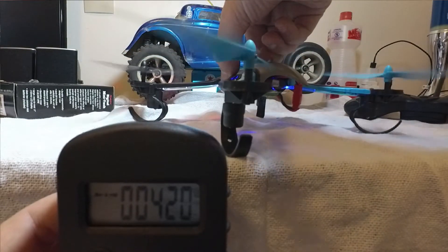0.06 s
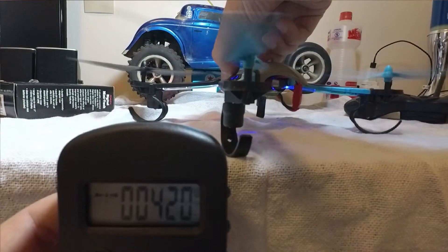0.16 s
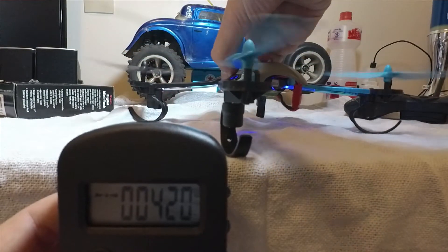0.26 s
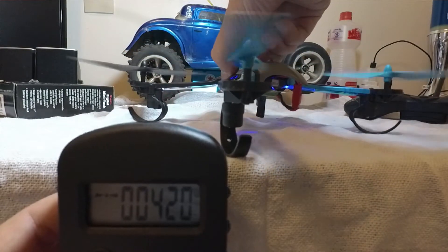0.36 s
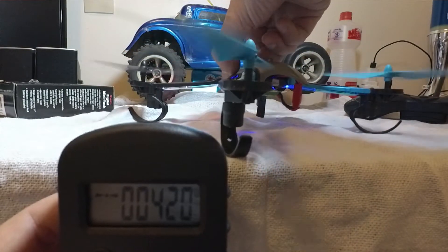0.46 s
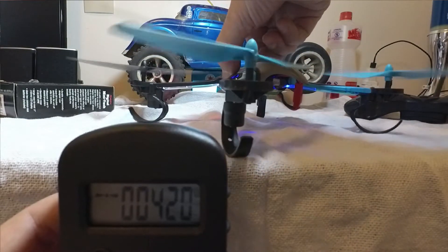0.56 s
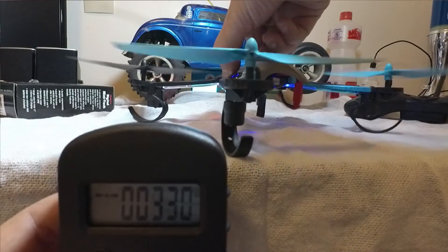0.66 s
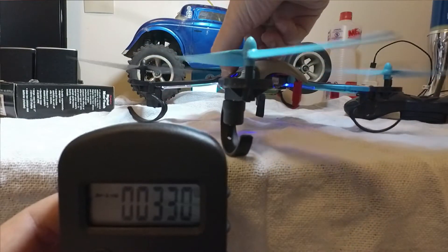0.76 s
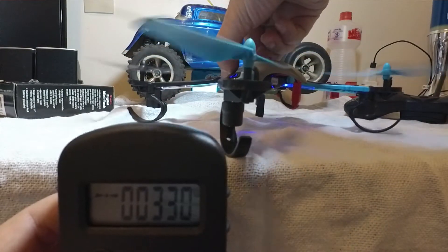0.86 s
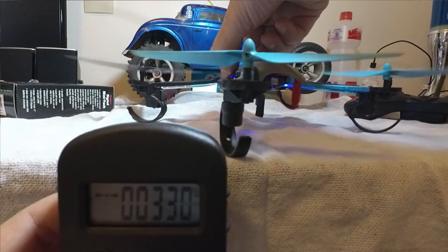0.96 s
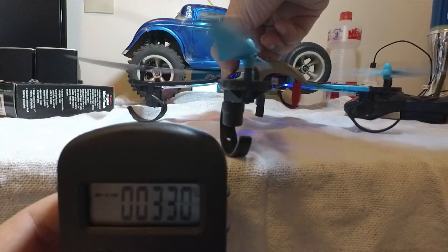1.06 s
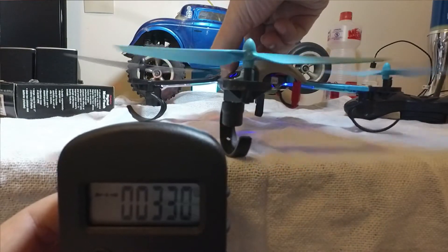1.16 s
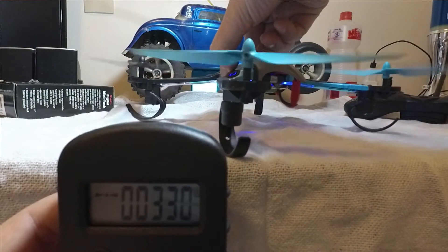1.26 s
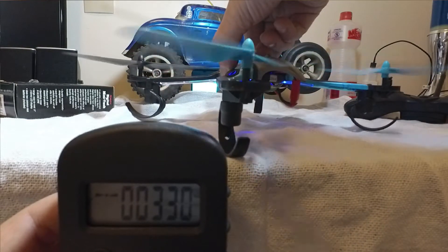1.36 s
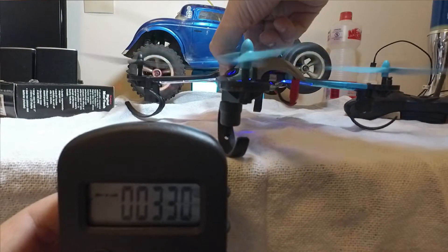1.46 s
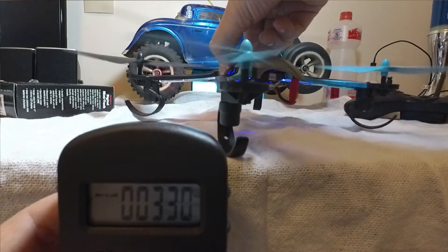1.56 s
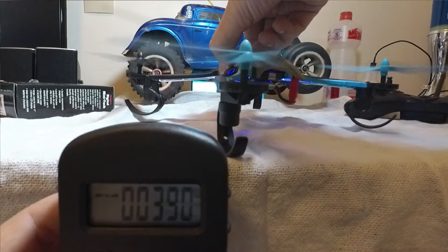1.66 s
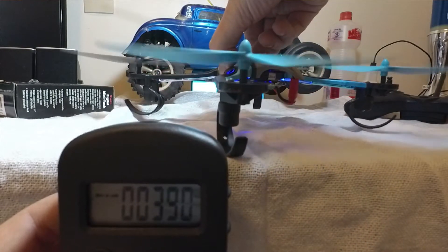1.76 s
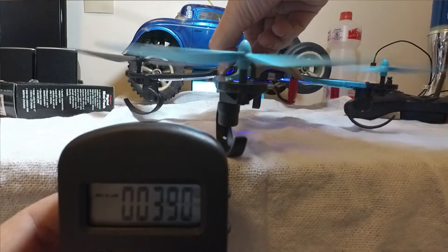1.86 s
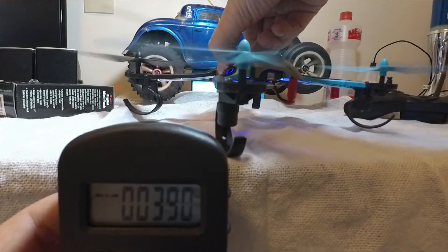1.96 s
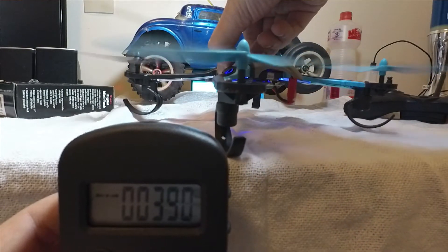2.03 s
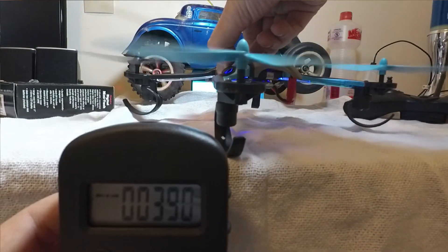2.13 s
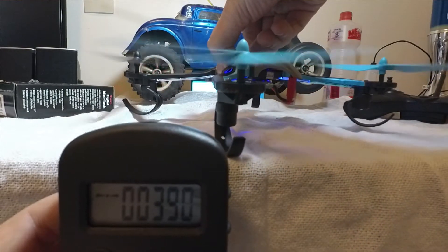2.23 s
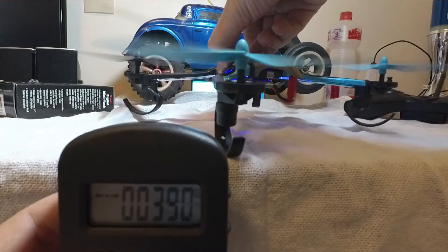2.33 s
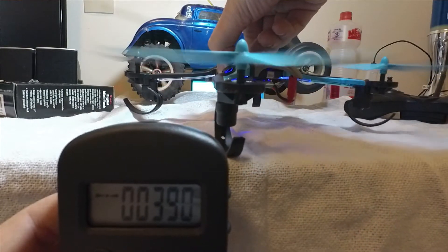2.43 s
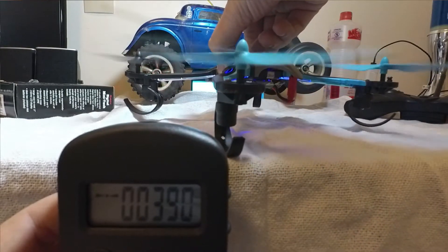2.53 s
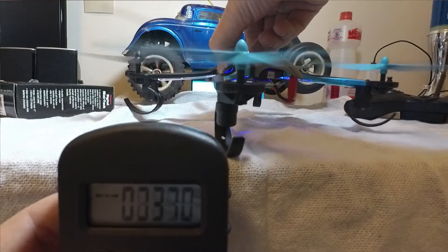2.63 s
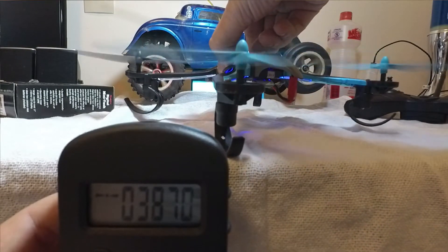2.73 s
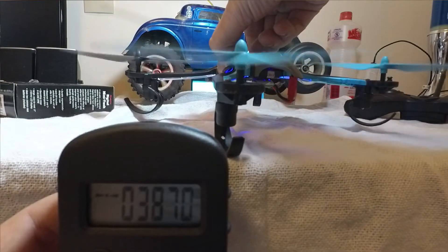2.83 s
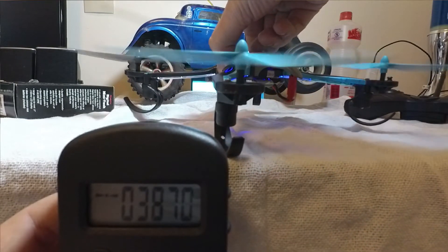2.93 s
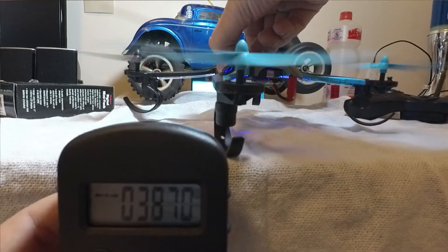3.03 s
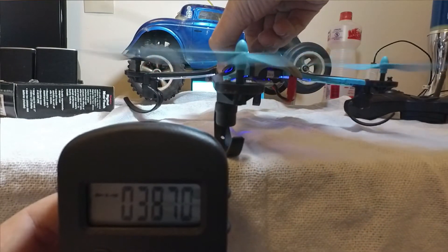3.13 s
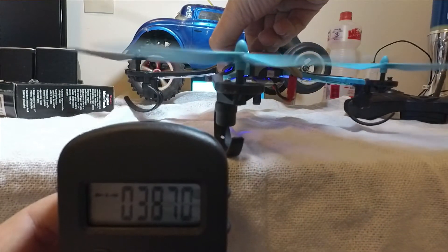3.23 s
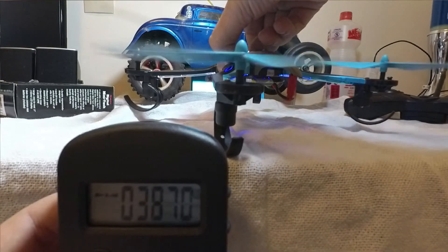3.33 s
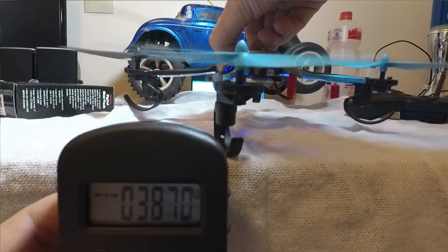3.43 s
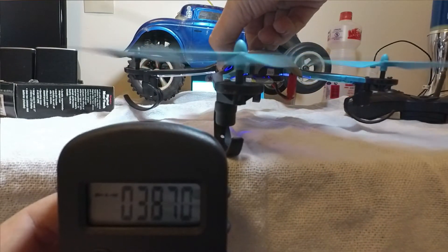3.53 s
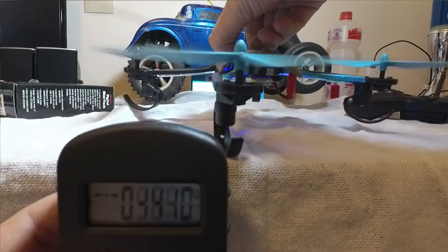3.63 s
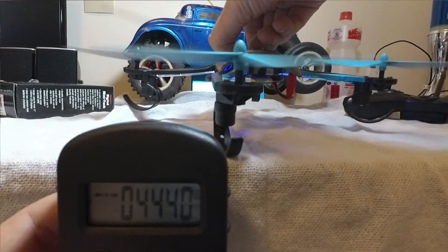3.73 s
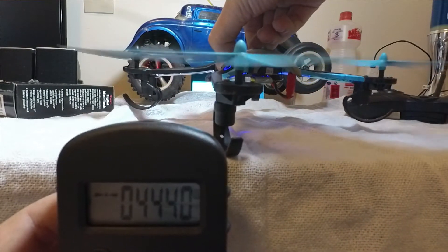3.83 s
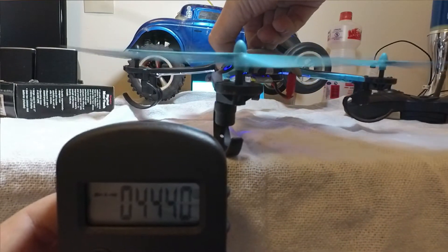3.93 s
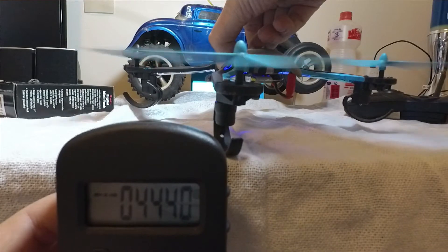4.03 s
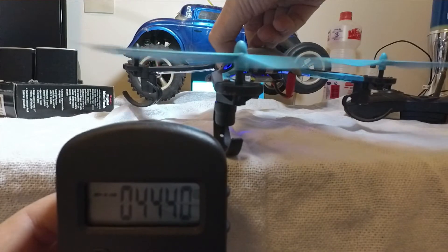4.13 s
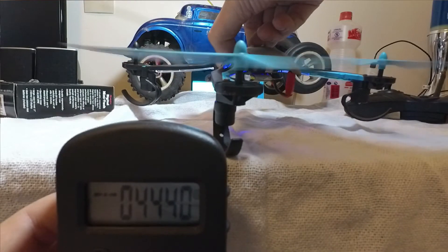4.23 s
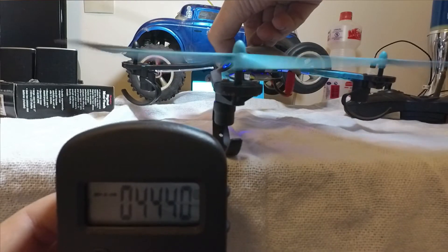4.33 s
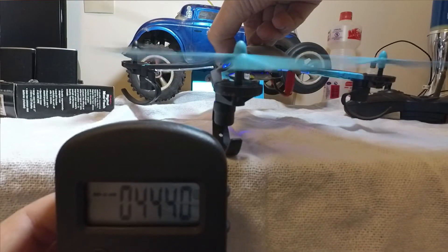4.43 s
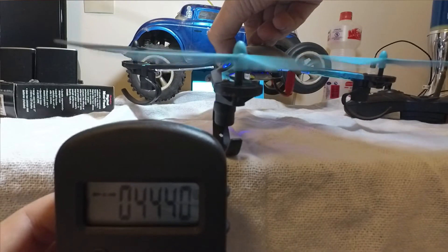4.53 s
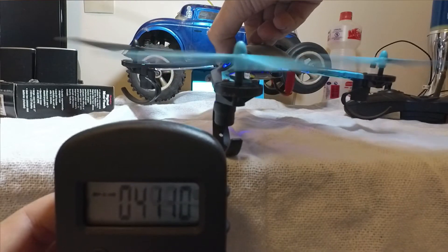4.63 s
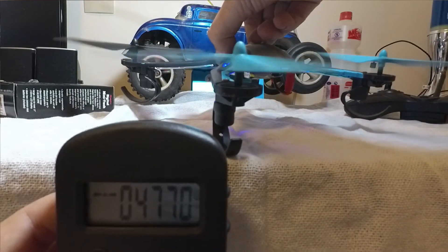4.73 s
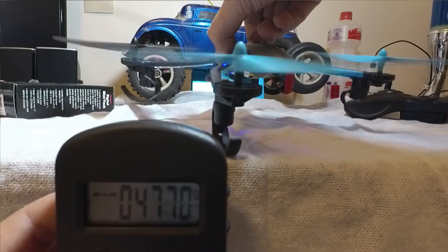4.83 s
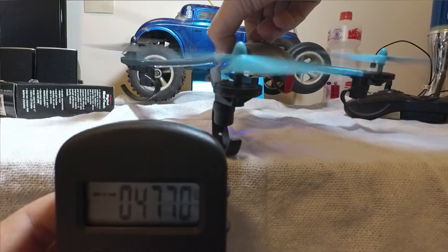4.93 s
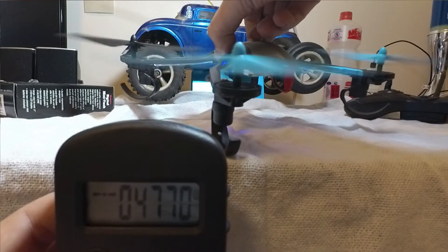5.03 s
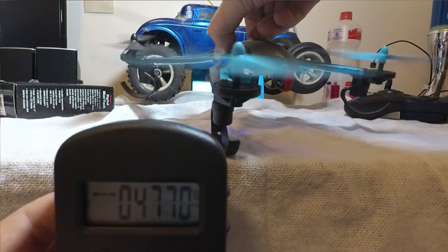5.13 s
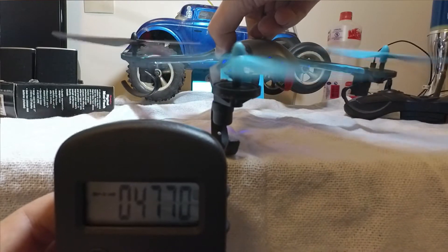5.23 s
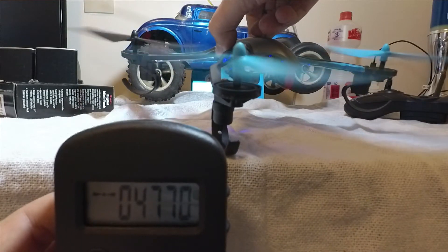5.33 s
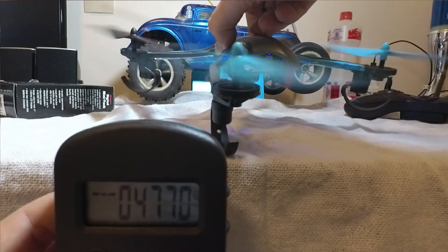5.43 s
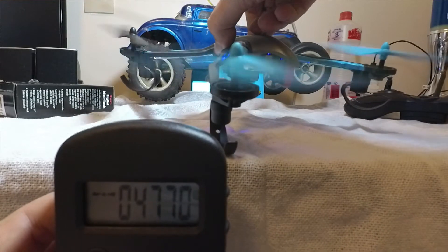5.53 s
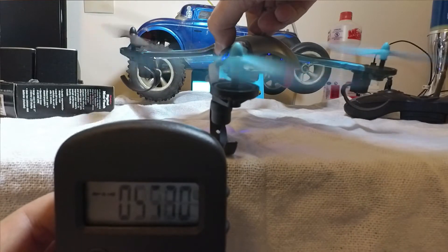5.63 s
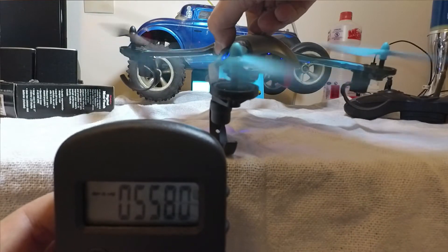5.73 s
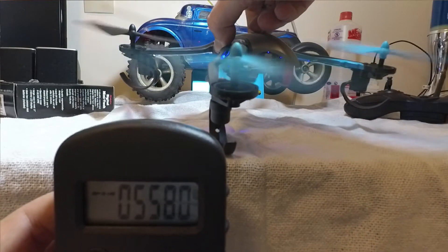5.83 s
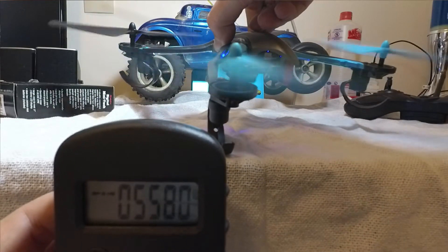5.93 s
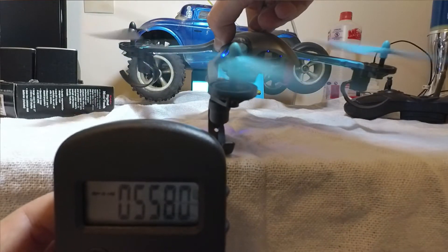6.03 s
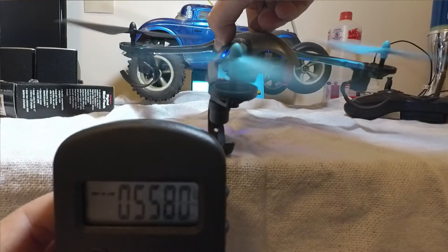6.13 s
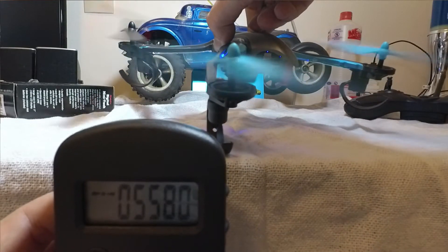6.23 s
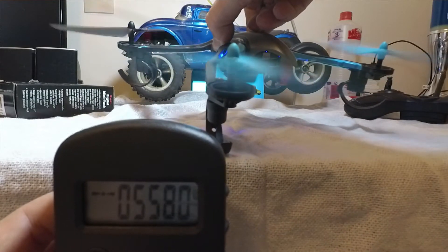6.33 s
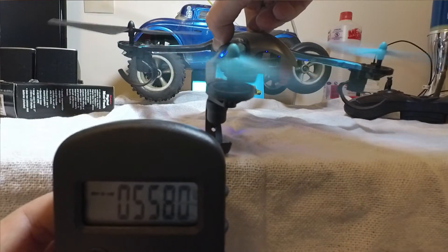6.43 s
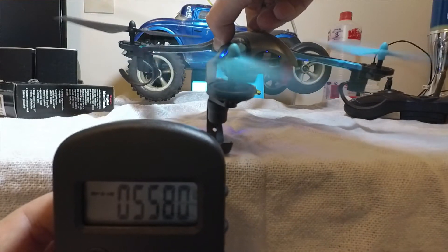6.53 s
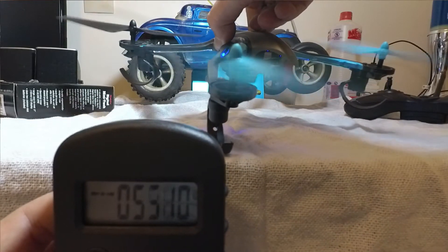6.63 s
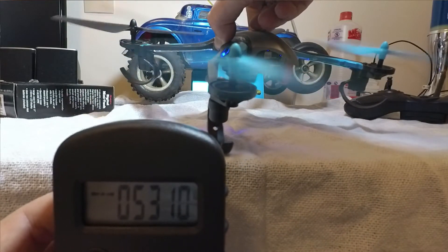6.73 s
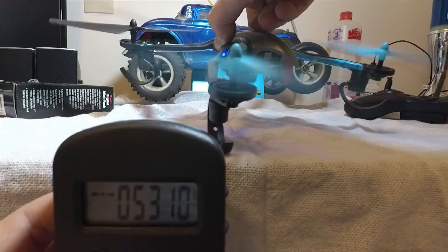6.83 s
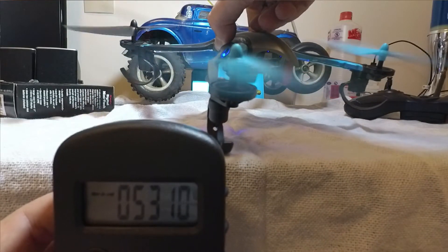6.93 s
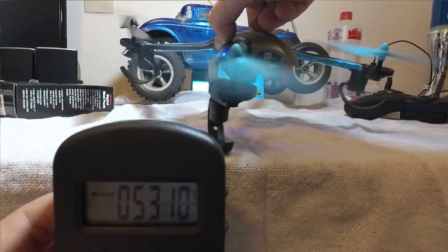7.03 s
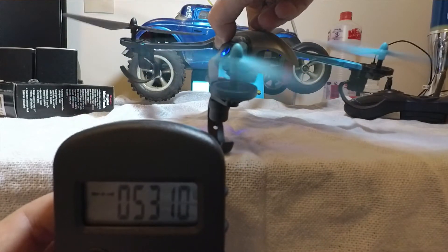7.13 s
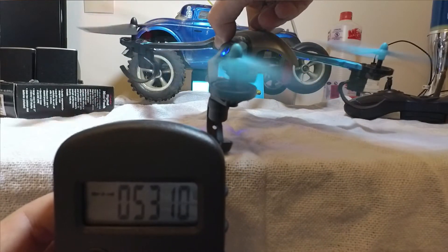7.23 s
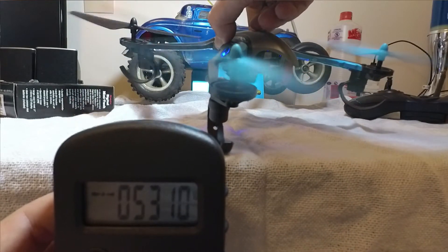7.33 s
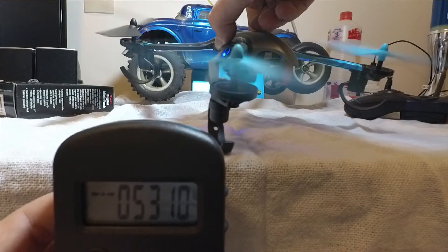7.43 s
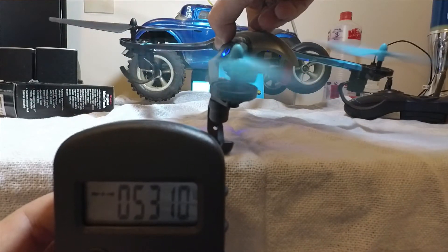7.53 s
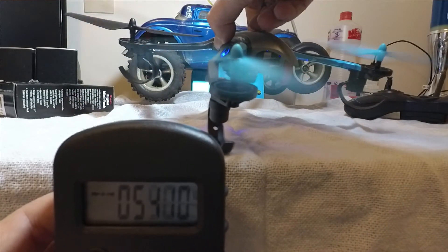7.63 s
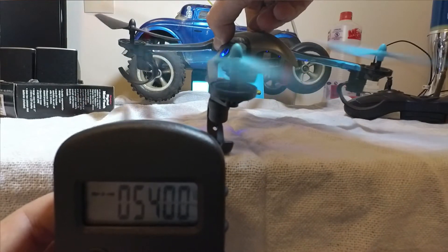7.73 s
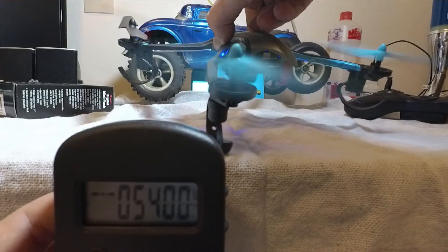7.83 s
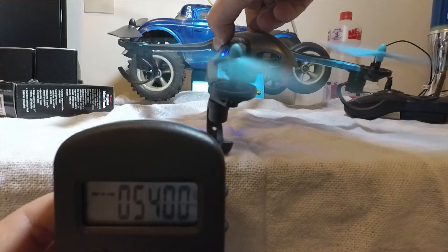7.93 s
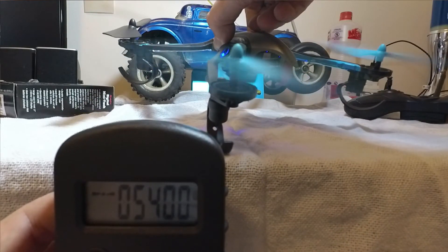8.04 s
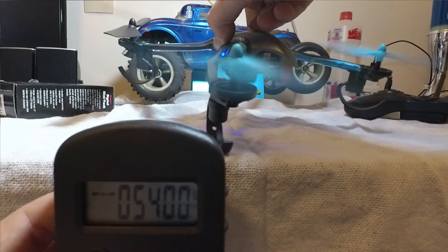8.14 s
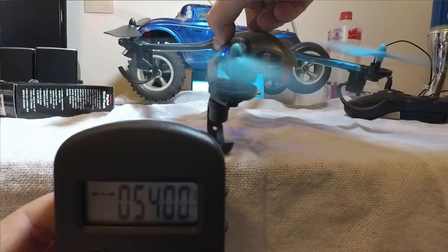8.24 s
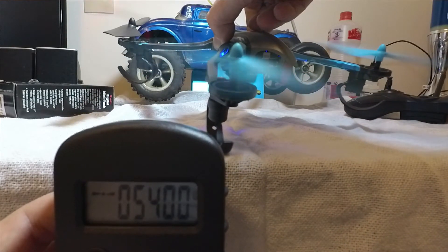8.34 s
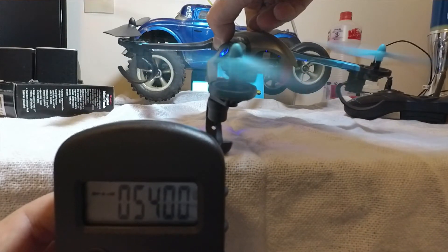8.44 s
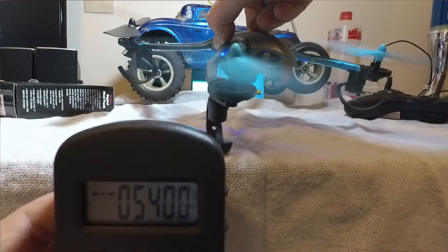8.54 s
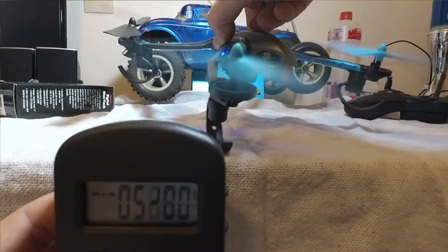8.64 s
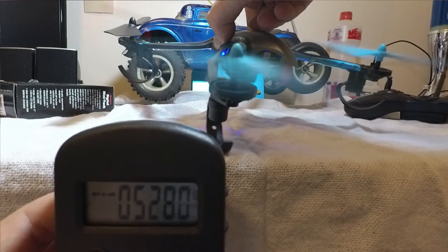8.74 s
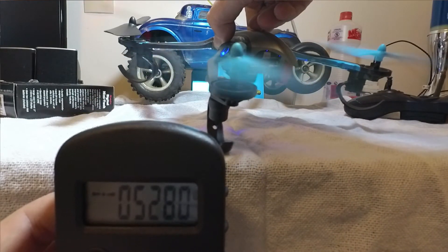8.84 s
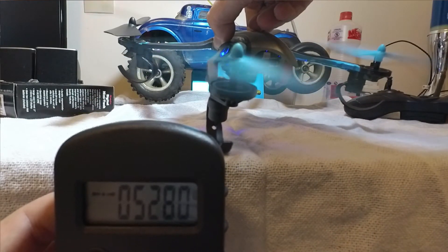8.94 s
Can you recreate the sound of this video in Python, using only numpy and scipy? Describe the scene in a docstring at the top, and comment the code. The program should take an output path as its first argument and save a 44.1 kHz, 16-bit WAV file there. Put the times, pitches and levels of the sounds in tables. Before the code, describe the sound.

Small electric motors and plastic propellers idle with a ticking rattle, then speed up to a steady buzzing whine indoors.

```python
"""A toy quadcopter, held down by hand on a cloth in a small room, is slowly throttled up.
Three brushed motors each turn a propeller through a plastic gear. The teeth whine, knock and rattle
in the hollow frame, which rings near 3.6 kHz. The blades hum and blow air at the microphone,
and the motor current, switched on and off very fast, adds a thin whistle of steady pitch."""
import sys
import numpy as np
from scipy import signal
from scipy.fft import rfft, irfft, next_fast_len
from scipy.io import wavfile

SR = 44100
rng = np.random.default_rng(int(sys.argv[2]) if len(sys.argv) > 2 else 0)


def pcm_store(signal):
    """Save signal as 16-bit PCM."""
    levels = np.round(np.clip(np.atleast_2d(signal), -1, 1) * 32767)
    wavfile.write(sys.argv[1], SR, levels.astype(np.int16).T)


N = 396018
TIME = np.arange(N) / SR
SIZE = next_fast_len(N + SR // 2, True)
HZ = np.maximum(np.arange(SIZE // 2 + 1) * SR / SIZE, 1)

GEAR_TEETH, MOTOR_TURNS = 77, 7  # both per propeller turn
FULL_SPEED = 66  # turns per second, like every speed here; "pace" is speed as a share of this


def from_db(db):
    """Turn decibels into a gain."""
    return 10 ** (np.asarray(db) / 20)


def rms_one(x):
    """Scale a signal to a power of 1."""
    return x / np.sqrt(np.mean(x ** 2) + 1e-20)


def in_time(rows):
    """Join (time, value) points with straight lines, one value per sample."""
    return np.interp(TIME, *np.transpose(rows))


def by_speed(speed, full_db, doubling_db):
    """A level in dB that rises by the same step each time the speed doubles."""
    return full_db + doubling_db * np.log2(speed / FULL_SPEED)


def bell(x, centre, half_width):
    """A smooth hump of height 1."""
    return np.exp(-((x - centre) / half_width) ** 2)


def gate(start, end, ramp_s=0.011):
    """1 between two times and 0 outside, with short ramps."""
    return np.clip(np.minimum(TIME - start, end - TIME) / ramp_s + .5, 0, 1)


def drift(rate):
    """A smooth random wobble of size about 1 that changes about `rate` times a second."""
    pole = np.exp(-40 * np.pi * rate / SR)
    noise = rng.standard_normal(N // 20 + 3002)
    slow = signal.lfilter([1], [1, -2 * pole, pole * pole], noise)[3000:]
    return np.interp(np.arange(N) / 20, np.arange(len(slow)), rms_one(slow))


def shape(points):
    """A gain for every frequency, from a few (frequency, level) points."""
    hz, db = np.transpose(points)
    return from_db(np.interp(np.log(HZ), np.log(hz), db))


def causal(gain):
    """A filter with this gain that rings only after it is struck (minimum phase)."""
    cepstrum = irfft(np.log(gain + 1e-7), SIZE)
    cepstrum[1:SIZE // 2] *= 2
    cepstrum[SIZE // 2 + 1:] = 0
    return np.exp(rfft(cepstrum))


def through(x, response):
    """Pass a signal through a filter."""
    return irfft(rfft(x, SIZE) * response, SIZE)[:N]


def unit_band(response, low_hz, high_hz):
    """Scale a filter so that white noise of power 1 leaves power 1 in a band."""
    return response / np.sqrt(np.mean(np.abs(response) ** 2 * (HZ > low_hz) * (HZ < high_hz)))


def room(x, fade_s=0.27, wall_hz=3820, level_db=-11):
    """The walls add dense, dull echoes that begin after 3 ms and die away."""
    t = TIME[:SR // 2]
    tail = rng.standard_normal(len(t)) * from_db(-60 * t / fade_s) * (t > .003)
    echoes = rfft(tail / np.sqrt(np.sum(tail ** 2)), SIZE) / (1 + 1j * HZ / wall_hz)
    return x + from_db(level_db) * through(x, echoes)


def airflow(speed, still_db=-57, wash_db=-50.5):
    """Air rushes off the blade tips, more with speed, and gusts blown downward hit the microphone."""
    # tone of the rushing air: (frequency [Hz], relative level [dB])
    rush_tone = [(40, -6), (100, -7), (220, 5.5), (400, 2), (800, 0.5), (1300, 1.5), (2200, -16),
                 (4000, 0.5), (12000, -44)]
    # tone of the wind's rumble: (frequency [Hz], relative level [dB])
    rumble_tone = [(12, -11), (30, 1), (55, 5.5), (90, -1), (160, -9.5), (350, -19.5), (1000, -38),
                   (4000, -76)]
    # gusts: (time [s], half length [s], level [dB])
    gusts = [(.02, 0.1, -38.5), (1.647, 0.11, -44.5), (1.978, 0.033, -38), (2.107, .03, -43.5),
             (2.97, .15, -48)]
    air = np.hypot(from_db(still_db), from_db(by_speed(speed, full_db=-47, doubling_db=21)))
    wash = from_db(wash_db) + sum(from_db(db) * bell(TIME, s, length) for s, length, db in gusts)
    rush = air * through(rng.standard_normal(N), unit_band(shape(rush_tone), 690, 1028))
    rumble = wash * through(rng.standard_normal(N), unit_band(shape(rumble_tone), 23, 44.8))
    return rush + rumble


def whistle(pace, switching_hz=3359.5, power_on_s=1.15, waver_db=2.0):
    """The motor coils sing at the switching rate and its multiples; the brushes make them sputter."""
    # one row per harmonic: (idle [dB], low throttle [dB], middle throttle [dB], full throttle [dB])
    harmonics = [(-61, -49, -34, -41.5), (-46, -45, -39.5, -40), (-67, -50, -50, -44.5),
                 (-79, -68, -64, -64)]
    powered = gate(power_on_s, np.inf)
    broken = np.clip(.45 + .43 * pace ** 2, 0, .97)  # the share that sputters
    sound = 0
    for k, (idle_db, *throttle_db) in enumerate(harmonics, 1):
        db = idle_db + powered * (np.interp(pace, [0, .75, 1], throttle_db) - idle_db)
        sputter = np.sqrt(1 - broken ** 2) + broken * (drift(270) + 1j * drift(220)) / np.sqrt(2)
        tone = np.real(sputter * np.exp(2j * np.pi * switching_hz * k * TIME))
        sound += from_db(db + waver_db * drift(8.9)) * tone
    return np.sqrt(2) * sound


def blades(angle, level_db, harmonics, pace=1, sharpening=0.19):
    """Two blades each push one pulse of air per turn: a hum, brighter as the pace rises."""
    wave = sum(from_db(db) * pace ** (sharpening * max(k - 2, 0)) * np.cos(k * angle)
               for k, db in harmonics)
    return from_db(level_db) * np.sqrt(2) * wave


def shaft_angle(speed, flutter):
    """The angle of a propeller whose speed is never quite even."""
    return 2 * np.pi * np.cumsum(speed * (1 + flutter * drift(12))) / SR + rng.uniform(0, 2 * np.pi)


def motor(angle, level_db):
    """The motor ticks on each of its turns, so fast that it buzzes."""
    turn = MOTOR_TURNS * angle + .08 * drift(25)
    return from_db(level_db) * sum(np.cos(k * turn + rng.uniform(0, 2 * np.pi)) for k in range(2, 8))


def twitches():
    """Surges of current jolt the near motor before it gets going; returns a boost in dB."""
    # (start [s], length [s], boost [dB])
    surges = [(1.153, 0.054, 1.5), (1.26, .055, 2.5), (1.36, 0.071, 1.5), (1.533, 0.14, 2)]
    return sum(db * gate(s, s + length) for s, length, db in surges)


def knocks(decay_s=0.0049, gain_db=10.5):
    """A gear slaps across the gap between its teeth: a few milliseconds of chatter."""
    # hard knocks: (time [s], relative level [dB])
    slaps = [(0.028, -15), (0.0563, -19), (0.2114, -14), (0.7908, -12.5), (0.853, -15.5), (1.0106, -25),
             (1.2884, -15), (1.5588, -11), (1.6591, -15), (1.718, -10.5), (2.077, -12), (2.2712, -11),
             (2.2957, -14)]
    hits = np.zeros(N)
    for s, db in slaps:
        hits[int(s * SR)] = from_db(db + gain_db)
    envelope = signal.lfilter([1], [1, -np.exp(-1 / (decay_s * SR))], hits + 1e-18)
    return envelope * rng.standard_normal(N)


def rattle(pressure, per_s, spread_db=2.0):
    """Loose teeth click at random, harder where the gears press together."""
    sizes = from_db(spread_db * np.minimum(rng.exponential(1, N), 4)) * rng.choice([-1, 1], N)
    struck = rng.random(N) < per_s / SR
    return rms_one(struck * sizes * pressure / np.sqrt(per_s))


def bare_gears(sharp, pace, dull_hz=10700):
    """Treble comes straight off the bare gears; slow teeth hit softly and sound duller."""
    # tone of the tooth edges: (frequency [Hz], relative level [dB])
    edge_tone = [(2000, -24.5), (4400, -3.5), (5400, -7.5), (6100, 9), (7100, 10.5), (8000, 1.5), (9300, 2),
                 (10200, -5.5), (11000, -1.5), (11900, 0), (13300, -15.5), (15200, -21)]
    soft = through(sharp, 1 / (1 + (HZ / dull_hz) ** 6))
    return through(soft + pace * (sharp - soft), unit_band(causal(shape(edge_tone)), 6980, 13000))


def plastic_frame(shaking, clicks, dip_hz=5300, dip_half_width_hz=260, dip_db=-12.5):
    """The hollow frame rings when shaken; in a dip between two resonances it hardly moves."""
    # resonances: (frequency [Hz], width [Hz], relative level [dB])
    rings = [(1166, 127, -18.5), (1659, 362, -10.5), (2040, 310, -17.5), (2443, 840, -12),
             (3763, 244, -6.5), (3587, 325, 2), (3880, 117, -11), (4520, 320, -27.5), (6130, 240, -12),
             (6720, 880, -15), (8510, 2170, -26.5), (10800, 1200, -38)]
    power = sum((from_db(db) / (1 + (2 * (HZ - hz) / width) ** 2)) ** 2 for hz, width, db in rings)
    response = causal(np.sqrt(power) * from_db(dip_db * bell(HZ, dip_hz, dip_half_width_hz)))
    return through(shaking, response) + through(clicks, unit_band(response, 1060, 2463))


def binding(angle, bind):
    """An off-centre gear presses harder once a turn; `bind` says how much."""
    return np.exp(bind * np.cos(angle)) / (1 + bind ** 2 / 2)


def gear_load(speed, shudders, base_db, base_bind, seated=1):
    """Tooth force in dB and bind: both swell near a speed at which the gear shudders."""
    force, bind = from_db(base_db) * seated, base_bind * seated
    for centre, width, db, extra in shudders:
        swell = bell(speed, centre, width)
        force = force + from_db(db) * swell
        bind = bind + extra * swell
    return 20 * np.log10(force + 1e-9), bind


def teeth(angle, force_db, overtone_db, bind, slack, uneven_db=2.47, swing=1.85, throb=.75):
    """Meshing teeth whine and throb with the motor; once a turn the pitch swings and overtones flare."""
    mesh = GEAR_TEETH * angle + swing * bind * np.cos(angle) + slack * drift(90)
    force = np.sqrt(2) * from_db(uneven_db * drift(49)) * (1 + throb * np.cos(MOTOR_TURNS * angle))
    whine = force * from_db(force_db) * binding(angle, bind) * np.cos(mesh)
    slip = .3 * drift(400)
    overtones = sum(np.exp(2 * k * bind * (np.cos(angle) - 1)) * np.cos(k * (mesh + slip))
                    for k in range(2, 5))
    return whine, force * from_db(overtone_db) * overtones


def far_propeller(speed, hum_db, shudders):
    """A farther, lightly loaded propeller: its hum, its shaking of the frame and its tooth pressure."""
    force_db, bind = gear_load(speed, shudders, base_db=-46, base_bind=.15)
    angle = shaft_angle(speed, flutter=0.00204)
    hum = blades(angle, hum_db, harmonics=[(2, -7), (4, -33)])
    slack = np.interp(speed, [34, 48], [1.0, .4])
    whine, overtones = teeth(angle, force_db, force_db + 2, bind, slack)
    buzz = motor(angle, level_db=-33) * speed / speed.max()
    return hum, whine + overtones + buzz, binding(angle, bind)


def near_propeller(speed, load_speed=18.6, firm_speed=33.3, lift_speed=62, base_db=-25):
    """The near propeller hums; its gear takes up load, meshes firmly, then is lifted free by thrust."""
    # the blades' pressure wave: (multiple of the turn rate, relative level [dB])
    harmonics = [(1, -31.5), (2, 2), (3, -24.5), (4, -5), (5, -34.5), (6, -17.5), (7, -35), (8, -32.5),
                 (9, -25.5), (10, -26.5), (11, -69), (12, -33.5)]
    # gear shudders: (speed [turns/s], half width [turns/s], tooth force [dB], extra bind)
    shudders = [(21.7, 2.5, -34, .05), (33, 2.1, -25.5, 0.17), (41.2, 3.1, -22, 0.045),
                (47.75, 2.8, -24.5, 0.39), (59, 5.3, -26, .05)]
    # a lightly loaded gear wanders between its teeth: (speed [turns/s], wander [radians])
    wander = [(20, 1.1), (32, .55), (42, .25)]
    loaded = 1 / (1 + (load_speed / speed) ** 4)
    firm = 1 / (1 + (firm_speed / speed) ** 12)
    seated = 1 / (1 + (speed / lift_speed) ** 16)
    force_db, bind = gear_load(speed, shudders, base_db, base_bind=.39, seated=seated)
    angle = shaft_angle(speed, flutter=0.00105)
    hum = blades(angle, by_speed(speed, full_db=-19, doubling_db=15.5), harmonics, speed / FULL_SPEED)
    overtone_db = -28 + .32 * (force_db - base_db)
    slack = np.interp(speed, *np.transpose(wander))
    whine, overtones = teeth(angle, force_db, overtone_db, bind, slack)
    shaking = whine + loaded * motor(angle, level_db=-30.5)
    pressure = binding(angle, bind * speed / (speed + 12))
    bite = np.sqrt(binding(angle, bind))  # strengthens the sharp clicks once a turn
    return hum, shaking, pressure, bite, firm * overtones


def scene(blade_count=2, clicks_per_s=2600, clicks_per_turn=50, rattle_db=-37.5, flare_db=-16):
    """Three geared propellers (near, slow and fast) speed up and shake one frame."""
    # near propeller idling, then getting going: (time [s], blade passes [1/s])
    near_start = [(0, 14), (1.0, 11), (1.5, 20), (1.62, 41.6), (1.9, 53.2)]
    # near propeller as the throttle opens in small steps: (time [s], blade passes [1/s])
    near_run = [(2.13, 64.6), (2.36, 66.9), (2.53, 68.2), (2.7, 69.8), (2.97, 77.3), (3.18, 78.9),
                (3.45, 86.3), (4.09, 98.5), (4.28, 104.7), (4.57, 110.0), (5.29, 123.6), (5.41, 127.1),
                (5.52, 128.8), (5.68, 128.9), (5.81, 131.3), (6.0, 132.0), (6.9, 132.0), (7.11, 133.5),
                (8.5, 133.3), (8.98, 132.9)]
    # the two far propellers: (time [s], speed [turns/s])
    slow_speed = [(0, 14), (2.5, 22), (4.0, 38), (5.0, 44.8), (5.35, 50.6), (5.8, 52.6), (6.7, 59),
                  (7.4, 61.2), (8.98, 61.4)]
    fast_speed = [(0, 36.4), (.5, 35.2), (1.0, 33), (1.7, 39.5), (2.08, 46.5), (3.4, 66), (5.5, 75),
                  (8.98, 76)]
    # their gears' shudders: (speed [turns/s], half width [turns/s], tooth force [dB], extra bind)
    slow_shudders = [(49.6, 6.6, -22.5, 0.23)]
    fast_shudders = [(35.7, 11.5, -25, 0.33), (78.5, 3.6, -22, .03)]
    # the fast propeller's hum, heard mostly at idle: (time [s], relative level [dB])
    fast_hum_levels = [(0, -36.5), (1.0, -39), (1.4, -51), (8.98, -59)]
    near = in_time(list(near_start) + list(near_run)) / blade_count
    slow, fast = in_time(slow_speed), in_time(fast_speed)
    pace = near / FULL_SPEED

    near_hum, near_shake, near_press, bite, flares = near_propeller(near)
    slow_hum_db = by_speed(slow, full_db=-25, doubling_db=18)
    slow_hum, slow_shake, slow_press = far_propeller(slow, slow_hum_db, slow_shudders)
    fast_hum, fast_shake, fast_press = far_propeller(fast, in_time(fast_hum_levels), fast_shudders)
    hum = near_hum + slow_hum + fast_hum

    jolt_db = twitches()
    pressure = .14 * near_press + .3 * slow_press + .5 * fast_press
    clicks = rattle(pressure * from_db(drift(25)), clicks_per_s + clicks_per_turn * near)
    shaking = near_shake + slow_shake + fast_shake + knocks()
    frame = plastic_frame(shaking, clicks * from_db(rattle_db + jolt_db))
    sharp_db = by_speed(near, full_db=-35, doubling_db=3) + 1.5 * jolt_db  # faster teeth hit harder
    treble = bare_gears(clicks * bite * from_db(sharp_db) + from_db(flare_db) * flares, pace)
    coils = whistle(pace) * from_db(jolt_db)
    return (room(frame + treble) + coils + hum + airflow((near + slow + fast) / 3))[None]


def record(dry, cutoff_hz=15300):
    """The highest treble is cut off steeply."""
    return through(dry[0], 1 / (1 + (HZ / cutoff_hz) ** 200))[None]


dry = scene()
out = record(dry)
pcm_store(out)
```